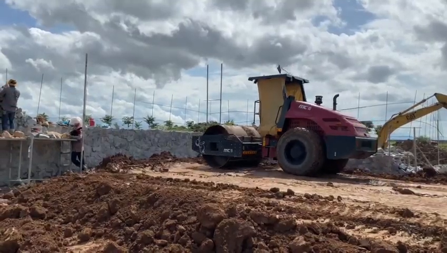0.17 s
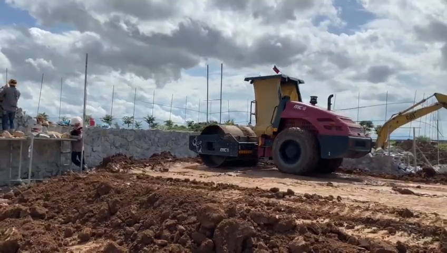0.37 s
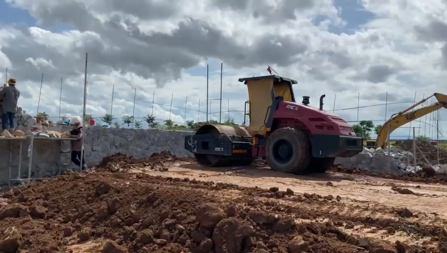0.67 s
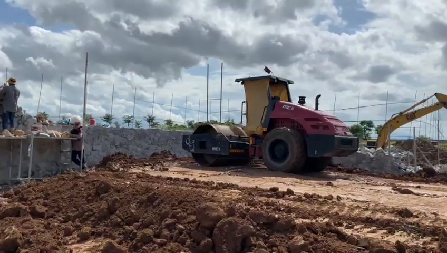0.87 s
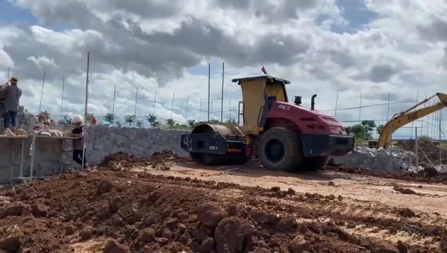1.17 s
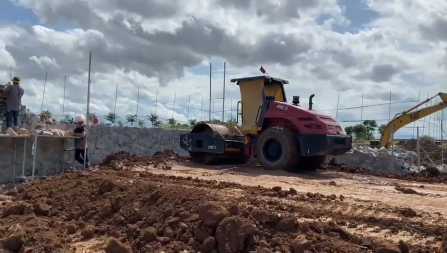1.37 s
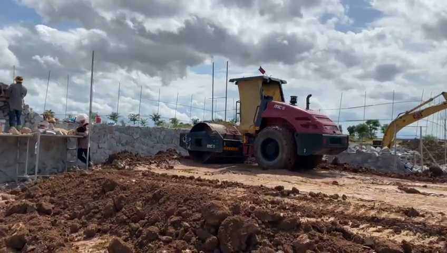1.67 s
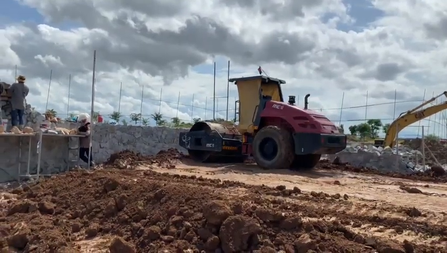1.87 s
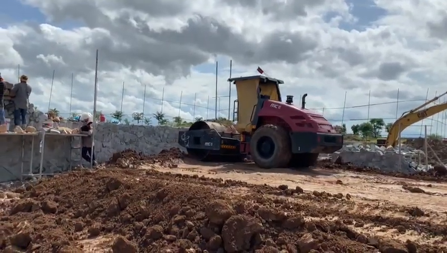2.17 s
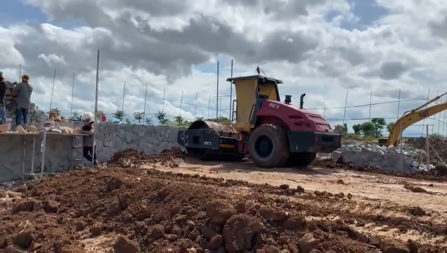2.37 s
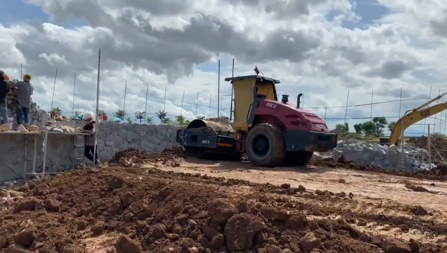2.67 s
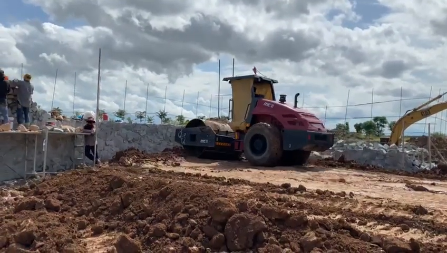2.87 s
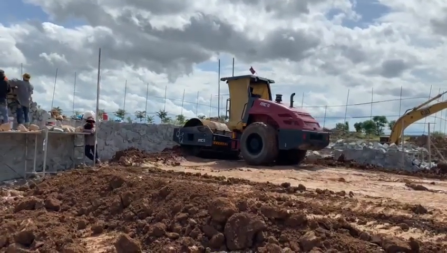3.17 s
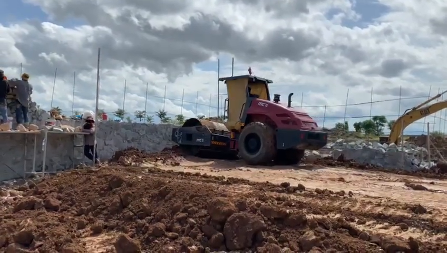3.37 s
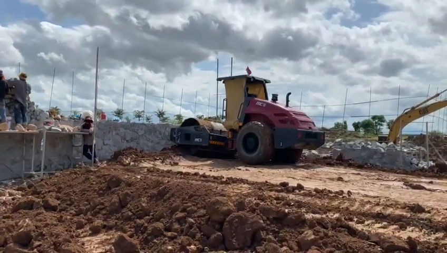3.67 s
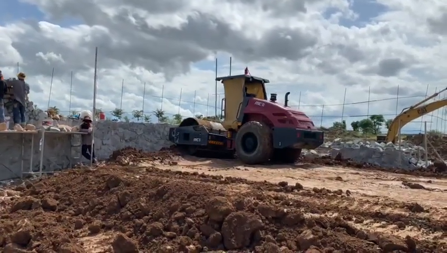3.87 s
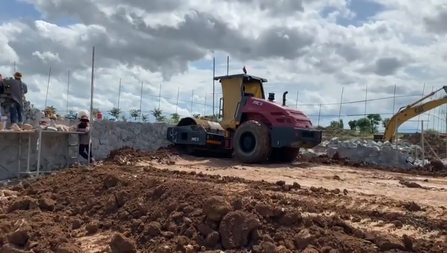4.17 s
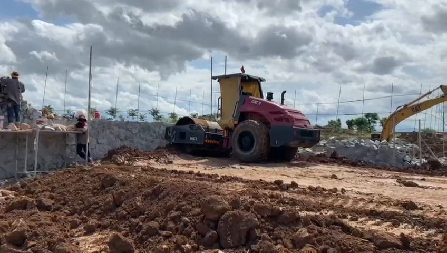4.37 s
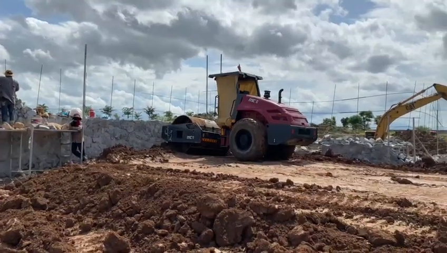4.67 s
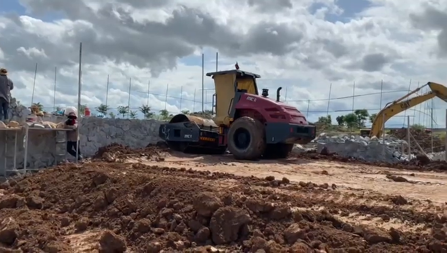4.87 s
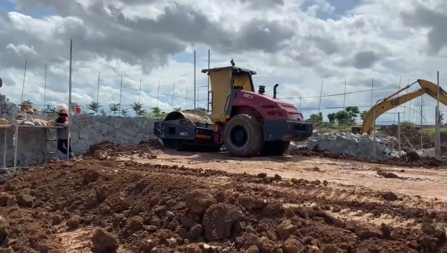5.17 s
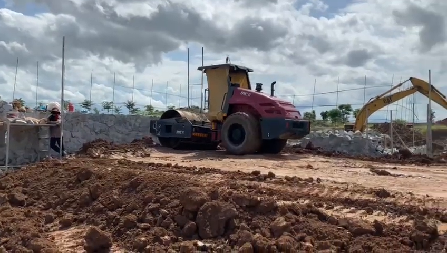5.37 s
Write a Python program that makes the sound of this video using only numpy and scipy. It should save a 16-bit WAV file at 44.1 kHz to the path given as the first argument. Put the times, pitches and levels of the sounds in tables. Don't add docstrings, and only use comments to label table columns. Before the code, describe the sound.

On an open building site, a diesel roller holds a low, buzzing drone under a wide roar of engine, fan and drum. A small knock touches the handheld phone early on, and a low grinding swell passes around one and a half seconds. Near four seconds a distant excavator's thin whistle climbs out of the roar, flickers and falls slightly. Light wind rumbles at the microphone.

```python
import sys
import numpy as np
from scipy import signal
from scipy.fft import dct, next_fast_len
from scipy.io import wavfile
from scipy.ndimage import uniform_filter1d

SR = 44100
rng = np.random.default_rng(int(sys.argv[2]) if len(sys.argv) > 2 else 0)


def materialize(psi):
    bounded = np.clip(np.atleast_2d(psi).T, -1, 1)
    quanta = np.round(bounded * 32767).astype(np.int16)
    wavfile.write(sys.argv[1], SR, quanta)


def natural_amplitude(level_db):
    exponent = np.asarray(level_db, float) / 20
    return 10 ** exponent


N = 243410

# (time [s], firing rate [Hz], firing tone level [dB])
FIRING = [(0.0, 54, -19), (0.25, 54.76, -22), (0.46, 54.74, -33), (0.69, 55.45, -24.5),
          (0.95, 55.84, -20.5), (1.3, 55.2, -23.5), (1.61, 55.24, -24.5), (2.07, 54.96, -18),
          (2.35, 55.4, -16.5), (2.76, 55.27, -18), (3.0, 55.38, -20), (3.22, 56.1, -19),
          (3.55, 56.28, -21.5), (4.0, 56.37, -18.5), (4.37, 56.12, -22), (4.62, 55.97, -19.5),
          (4.85, 55.6, -18), (5.52, 54.72, -17)]
# (multiple of the firing rate, level [dB])
STEADY_ORDERS = [(.5, -45), (3.0, -36), (3.5, -42), (5.0, -46.5), (6.0, -38), (6.5, -46), (7.0, -45),
                 (7.5, -41.5), (8.0, -43), (15.5, -39.5), (37.6, -63.5)]
# (multiple of the firing rate, level at cruise [dB],
# change above cruise [dB per Hz], change with load [dB])
PUSHED_ORDERS = [(1.5, -55, 5, 18), (2, -31.5, -6.5, -2), (4.5, -36, -20, 0.5), (3.9, -34.5, 2, -2.5)]
# (frequency [Hz], level [dB per Hz])
FRONT_BODY = [(15, -45), (40, -56.5), (75, -49.5), (105, -55.5), (170, -49), (230, -52), (295, -61),
              (335, -46), (430, -50), (500, -53.5), (620, -60.5), (760, -52), (860, -52.5), (1070, -54)]
# (frequency [Hz], level [dB per Hz])
FRONT_CLATTER = [(1130, -60.5), (1600, -59), (2030, -67.5), (2420, -59), (2600, -64), (2740, -72),
                 (2900, -66.5), (3150, -70.5), (3500, -68), (3780, -72.5), (4050, -68.5), (4400, -75.5),
                 (4750, -73.5), (5350, -73.5)]
# (frequency [Hz], level [dB per Hz])
TILTED_CLATTER = [(1130, -62), (1370, -54), (1700, -68), (2070, -59), (2300, -65), (2700, -67), (3050, -71),
                  (3400, -70), (3800, -72), (4300, -72), (4750, -78), (5000, -74), (5350, -76)]
# (frequency [Hz], level [dB per Hz])
FRONT_HISS = [(5800, -76.5), (6200, -79.5), (6600, -79), (7100, -80), (7500, -82), (7900, -86.5),
              (8350, -104), (8800, -87), (9000, -81.5), (10000, -80), (10700, -83.5), (11100, -90.5),
              (11600, -100), (12000, -120)]
# (frequency [Hz], level [dB per
# Hz])
SIDE_ROAR = [(15, -85), (70, -98), (140, -69.5), (290, -67.5), (400, -60.5), (850, -66.5), (1300, -61),
             (2100, -66.5), (3100, -69.5), (3700, -75.5),
             (4100, -81), (4350, -77.5), (4600, -78.5), (5000, -77.5), (5700, -77), (6250, -84),
             (6650, -80), (7050, -85), (7400, -80.5), (8700, -76), (9400, -85.5), (10200, -104),
             (11050, -88.5), (11600, -84), (12000, -110)]
# (frequency [Hz], likeness [-1..1])
LEAN = [(100, -.2), (400, -0.4), (650, 0.58), (950, 0.16), (1350, 0.84), (1900, 0.00019), (2500, 0.12),
        (3200, 0.32), (4200, 0.35), (5000, 0.65), (5700, 0.46), (7000, 0.14), (9000, -.05)]
# (time [s], frequency [Hz])
TURBO = [(3.75, 5250), (3.93, 5580), (4.12, 6115), (4.27, 6400), (4.42, 6545), (4.54, 6598), (4.7, 6525),
         (5.16, 6088), (5.52, 5905)]
# (centre [s], half length [s], left level change [dB], lead of the left [radians])
SHADOWS = [
    (4.09, .04, -4, .5),
    (4.295, .02, -14, 0),
    (4.44, .03, -18, 1.5),
    (4.54, .12, -6.5, 2.4),
    (4.82, .025, -9, .5),
    (4.89, .03, -5, 0),
    (5.37, .06, -13, -2.6),
    (5.5, .1, -4, 0),
]
# (time [s], peak level [dB], frequency [Hz], width [Hz], length [s], pan to the right [-1..1])
BITS = [
    (.4015, -14, 900, 700, .004, .3),
    (5.46, -39.5, 5800, 2000, .035, .5),
]
# (centre [s], half length [s], level [dB])
GUSTS = [
    (.66, .2, -25),
    (4.0, 0.18, -31.5),
    (4.545, 0.19, -27),
]
# (frequency [Hz], step [dB])
ROUNDING_STEP = [(200, -32), (2000, -33), (3000, -35), (4500, -38.5), (6000, -40), (7500, -40), (9000, -41),
                 (11500, -43)]


def read(points, hz):
    f, value = np.transpose(points)
    return np.interp(np.log(hz + 1), np.log(f + 1), value)


def along(rows, t):
    s, *columns = np.transpose(rows)
    return [np.interp(t, s, column) for column in columns]


def evened(x):
    return x / np.sqrt(np.mean(x ** 2) + 1e-20)


def drift(width):
    once = uniform_filter1d(rng.standard_normal(N), int(width))
    return evened(uniform_filter1d(once, int(width)))


def bump(t, s, half):
    return np.exp(-((t - s) / half) ** 2)


def analytic(x):
    return signal.hilbert(x, next_fast_len(N))[:N]


def tone(hz, db, waver_db=1.5, slip=.2):
    angle = 2 * np.pi * (np.cumsum(hz) / SR + rng.random()) + slip * drift(3500)
    return np.sqrt(2) * natural_amplitude(db + waver_db * drift(3600)) * np.sin(angle)


def resonate(x, hz, width_hz):
    turn = np.exp(2j * np.pi * np.cumsum(hz * np.ones(len(x))) / SR)
    r = np.exp(-np.pi * width_hz / SR)
    smooth = signal.lfilter([(1 - r) ** 2], [1, -2 * r, r * r], x / turn)
    return 2 * (turn * smooth).real


def ringing_noise(hz, width_hz):
    return evened(resonate(rng.standard_normal(N), hz, width_hz))


def load(t):
    start_s, rise_s = 3.75, 0.81
    return np.sin(np.pi / 2 * np.clip((t - start_s) / rise_s, 0, 1)) ** 2


def exhaust(t):
    cruise_hz, push_lag_s = 55.4, 1
    pump_order, pump_db = 1.313, -35
    hz, firing_db = along(FIRING, t)
    lagging_hz = uniform_filter1d(hz, int(push_lag_s * SR), mode="nearest")
    push = np.maximum(lagging_hz - cruise_hz, 0)
    out = tone(hz, firing_db, waver_db=0.73, slip=0.021)
    for k, db, push_db, load_db in PUSHED_ORDERS:
        out = out + tone(k * hz, db + push_db * push + load_db * load(t))
    for k, db in STEADY_ORDERS + [(pump_order, pump_db)]:
        out = out + tone(k * hz, db, waver_db=4.0, slip=0.53)
    return out


def roar(t):
    roar_db, patch_db = 0.64, 0.93
    boom_hz, boom_width_hz, boom_db, boom_load_db = 360, 82, -0.6, 0.5
    tilt_held_s, tilt_settle_s, tilt_rest, tilt_lean = .36, .1, .1, 0.26
    wall_share, wall_ms, wall_tilt_ms = 0.12, 1, -.2
    cycle_throb, firing_gate = 0.03, 0.11
    frames = N // 256 + 5
    hz = np.fft.rfftfreq(1024, 1 / SR)[:, None]
    times = np.arange(frames) * 256 / SR
    a, b, c, d, patches = rng.standard_normal((frames, 513, 5)).T
    patches = evened(uniform_filter1d(uniform_filter1d(patches, 10, 0), 14, 1))

    settling = np.exp(-np.maximum(times - tilt_held_s, 0) / tilt_settle_s)
    tilt = np.clip(tilt_rest + (1 - tilt_rest) * settling, 0, 1)
    boom = (boom_db + boom_load_db * load(times)) * np.exp(-((hz - boom_hz) / boom_width_hz) ** 2)
    level = natural_amplitude(roar_db + boom + patch_db * patches + 17.5)
    lean = np.clip(read(LEAN, hz) * (1 - tilt_lean * tilt), -1, 1)
    front = (a + 1j * b) * level
    side = lean * front + np.sqrt(1 - lean ** 2) * (c + 1j * d) * level
    upright_db = read(FRONT_BODY + FRONT_CLATTER + FRONT_HISS, hz)
    tilted_db = read(FRONT_BODY + TILTED_CLATTER + FRONT_HISS, hz)
    front = front * natural_amplitude((1 - tilt) * upright_db + tilt * tilted_db)
    side = side * natural_amplitude(read(SIDE_ROAR, hz))
    echo_s = (wall_ms + wall_tilt_ms * tilt) / 1000
    side = side * abs(1 + wall_share * np.exp(-2j * np.pi * hz * echo_s))

    left_right = np.array([front + side, front - side])
    both = signal.istft(left_right, nperseg=1024, noverlap=768)[1][:, :N]
    low = signal.sosfiltfilt(signal.butter(2, 6000, fs=SR, output="sos"), both)
    hiss = both - low
    firings = 2 * np.pi * np.cumsum(along(FIRING, t)[0]) / SR
    return low * (1 + cycle_throb * np.cos(firings / 4)) + hiss * (1 + firing_gate * np.cos(firings))


def drum(t):
    return natural_amplitude(-28) * bump(t, 1.45, half=.5) * ringing_noise(hz=167, width_hz=110)


def excavator_engine(t):
    engine_hz, engine_db, half_order_db = 137.9, -34.5, -1.5
    sag_hz, dull_db = 0.77, -9.5
    hz = engine_hz - sag_hz * load(t)
    return tone(hz, engine_db + dull_db * load(t)) + tone(hz / 2, engine_db + half_order_db)


def excavator_turbo(t):
    start_s, spool_s, spool_db = TURBO[0][0], .45, -20
    fuzz_width_hz, fuzz_share = 150, 0.38
    left_db, right_db, lead = -36, -46, .3
    hz = uniform_filter1d(along(TURBO, t)[0], size=3000, mode="nearest")
    for s, half, loss_db, turn in SHADOWS:
        left_db = left_db + loss_db * bump(t, s, half)
        lead = lead + turn * bump(t, s, half)
    spool = natural_amplitude(spool_db * np.clip(1 - (t - start_s) / spool_s, 0, 1)) * (t > start_s)
    fuzz = ringing_noise(hz, fuzz_width_hz)
    whistle = analytic(tone(hz, 0, waver_db=-0.7) + fuzz_share * fuzz)
    whistle = whistle * natural_amplitude(1.8 * drift(500)) * spool
    return np.array([natural_amplitude(left_db) * whistle, natural_amplitude(right_db) * whistle * np.exp(-1j * lead)]).real


def bits(t):
    out = np.zeros((2, N))
    for s, db, hz, width_hz, length, pan in BITS:
        age = np.maximum(t - s, 0) / length
        shape = (1 - np.exp(-8 * age)) * np.exp(-age ** 2)
        out += natural_amplitude(db) * ringing_noise(hz, width_hz) * shape * np.array([[1 - pan], [1 + pan]])
    return out


def wind(t):
    breeze_db = -40.5
    strength = natural_amplitude(breeze_db) + sum(natural_amplitude(db) * bump(t, s, half) for s, half, db in GUSTS)
    return ringing_noise(hz=80, width_hz=67) * strength * natural_amplitude(1.2 * drift(1500))


def scene():
    t = np.arange(N) / SR
    low = exhaust(t) + drum(t) + wind(t)
    wide = roar(t) + excavator_engine(t) + excavator_turbo(t) + bits(t)
    late = .022 * analytic(low).imag
    return low + np.array([late, -late]) + wide


def phone_rounding(pair, scatter_db=2.5, mute_db=-2, masked_db=-6.8):
    window = signal.windows.kaiser_bessel_derived(2048, 4 * np.pi)
    sum_difference = np.array([pair[0] + pair[1], pair[0] - pair[1]]) / 2
    padded = np.pad(sum_difference, ((0, 0), (993, 3072)))
    blocks = np.lib.stride_tricks.sliding_window_view(padded, 2048, axis=1)[:, ::1024] * window
    a, b, c, d = np.split(blocks, 4, axis=2)
    folded = np.concatenate([-c[..., ::-1] - d, a - b[..., ::-1]], axis=2)
    lines = dct(folded, type=4, norm="ortho")

    scatter = uniform_filter1d(rng.standard_normal((lines.shape[1], 128)), 3, 0)
    scatter = np.repeat(evened(scatter), 8, axis=1)
    step = natural_amplitude(read(ROUNDING_STEP, np.arange(1024) * SR / 2048) + scatter_db * scatter)
    band = np.repeat((lines ** 2).reshape(2, -1, 128, 8).mean(-1), 8, axis=2)
    nearby = uniform_filter1d(np.median(band.sum(0), axis=0), 48)
    nearby = nearby * np.clip(np.arange(1024) / 100 - .3, 0, 1)
    unmasked = band > nearby * natural_amplitude(2 * masked_db + scatter_db * scatter)
    heard = (band > step ** 2 * natural_amplitude(2 * mute_db)) & unmasked
    whole_steps = np.floor(abs(lines / step) ** .75 + .4054) ** (4 / 3)
    lines = np.sign(lines) * whole_steps * step * heard

    u, v = np.split(dct(lines, type=4, norm="ortho"), 2, axis=2)
    blocks = np.concatenate([v, -v[..., ::-1], -u[..., ::-1], -u], axis=2) * window
    both = (blocks[:, 1:, :1024] + blocks[:, :-1, 1024:]).reshape(2, -1)
    both = np.concatenate([padded[:, 993:1024], both], axis=1)[:, :N]
    return np.array([both[0] + both[1], both[0] - both[1]])


def top_cut(x):
    return signal.sosfilt(signal.butter(12, 11620, fs=SR, output="sos"), x)


def record(dry):
    mic = signal.butter(2, 12, "high", fs=SR, output="sos")
    mix = phone_rounding(signal.sosfilt(mic, dry))
    return top_cut(mix)


dry = scene()
out = record(dry)
materialize(out)
```